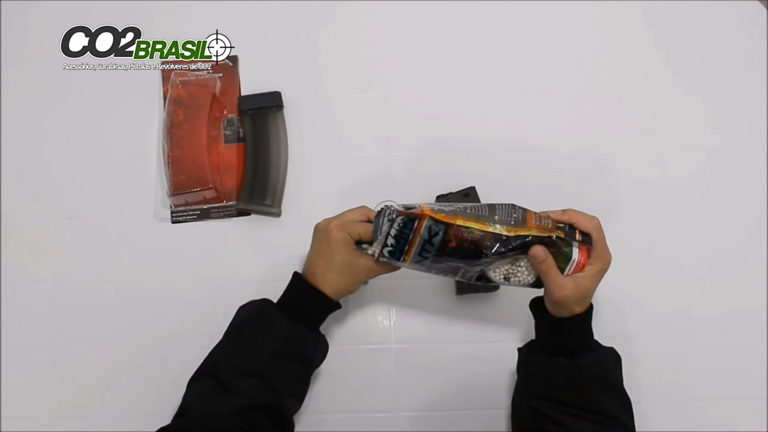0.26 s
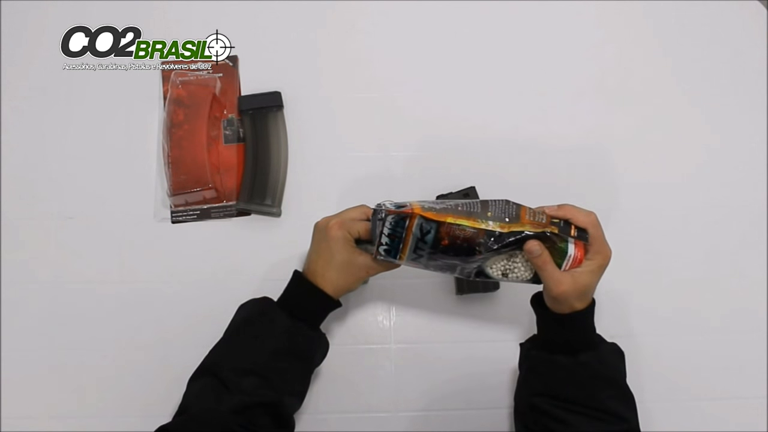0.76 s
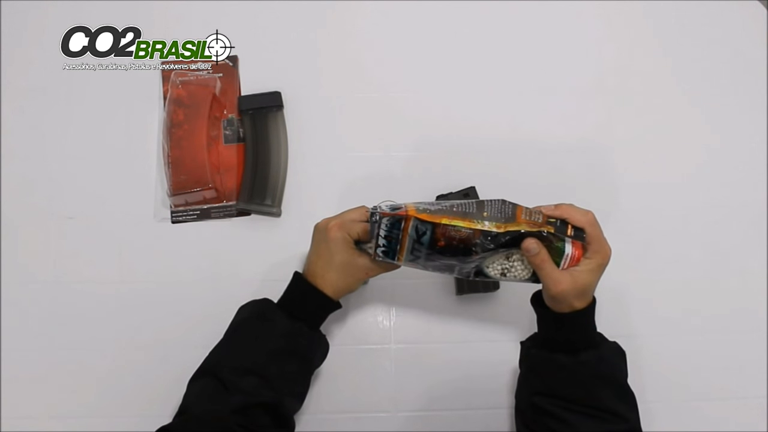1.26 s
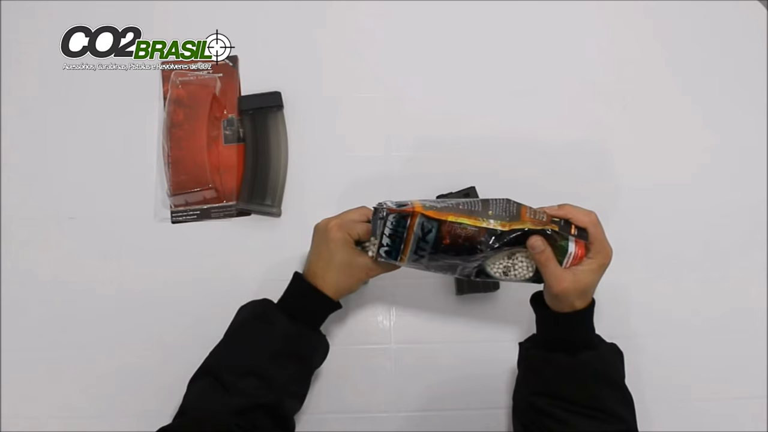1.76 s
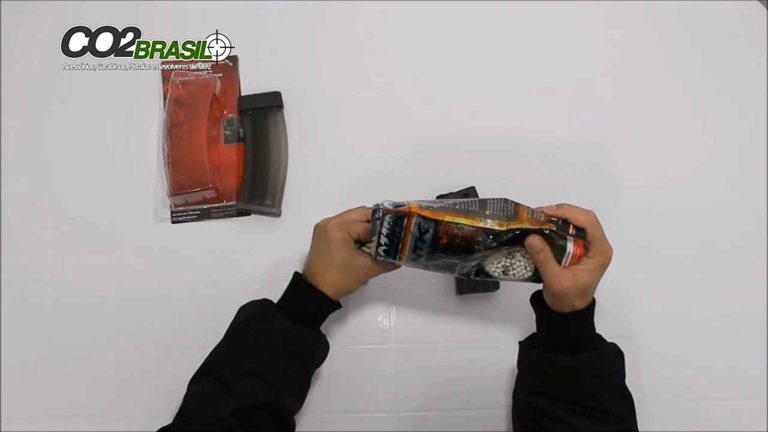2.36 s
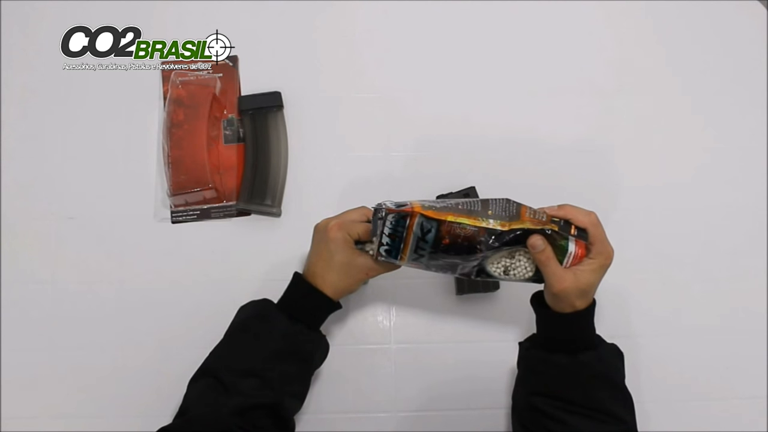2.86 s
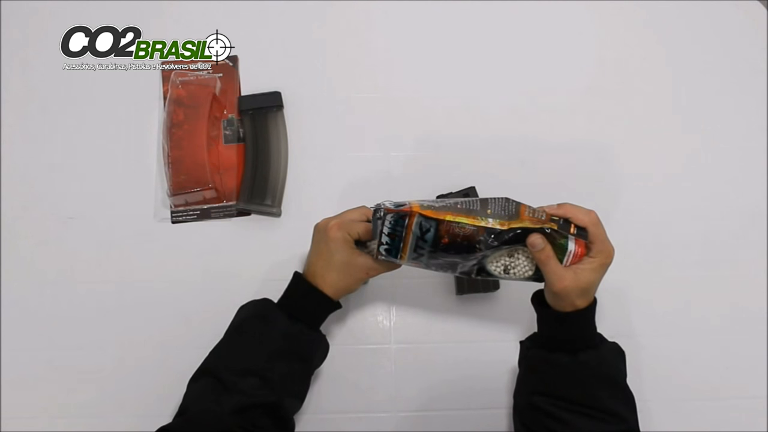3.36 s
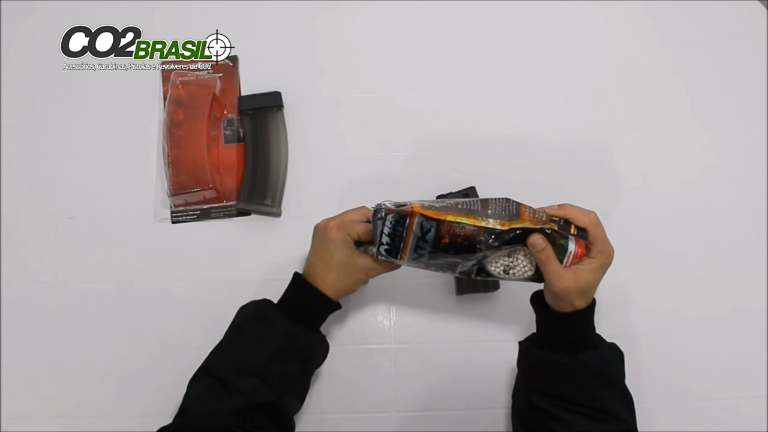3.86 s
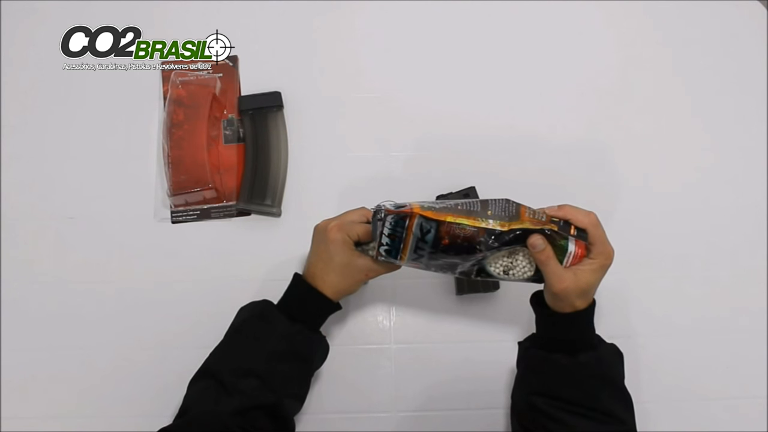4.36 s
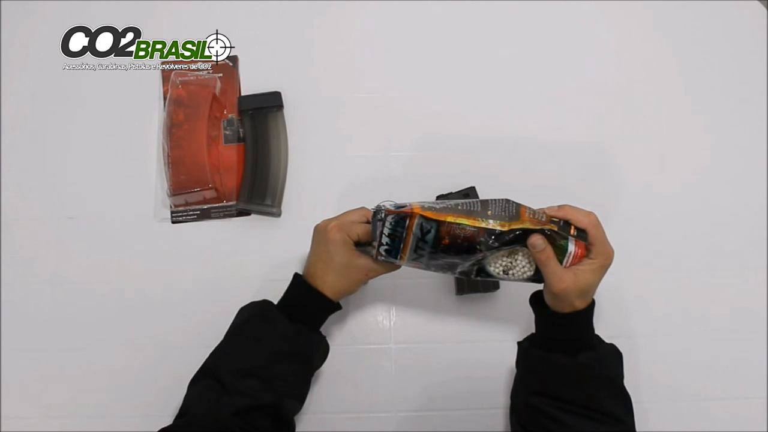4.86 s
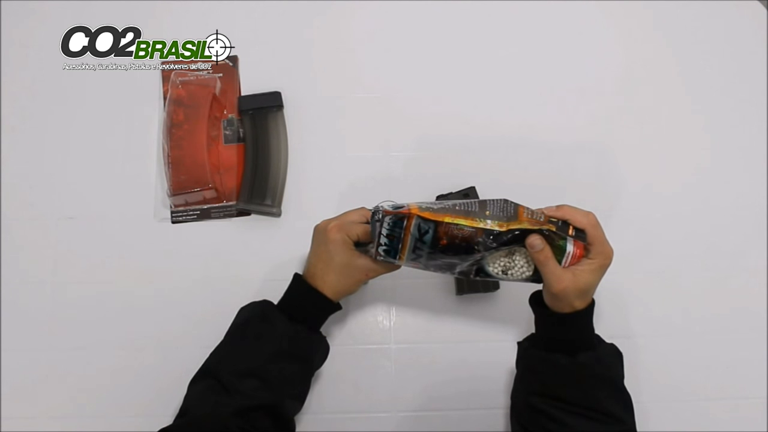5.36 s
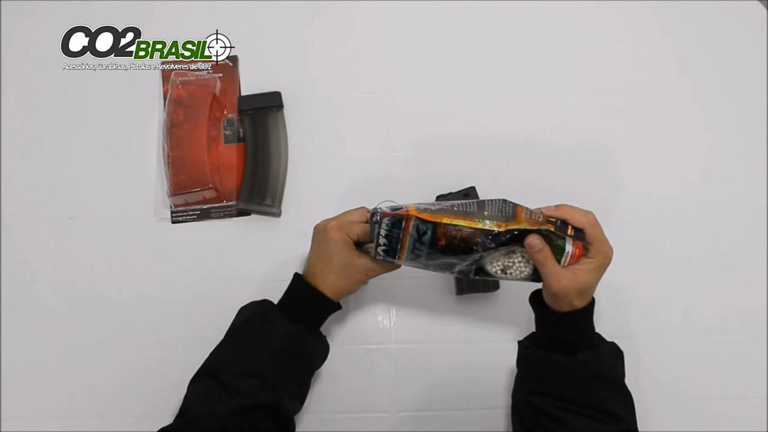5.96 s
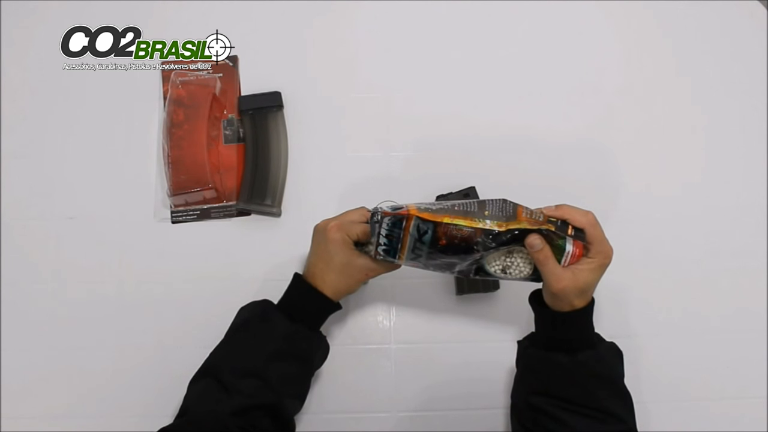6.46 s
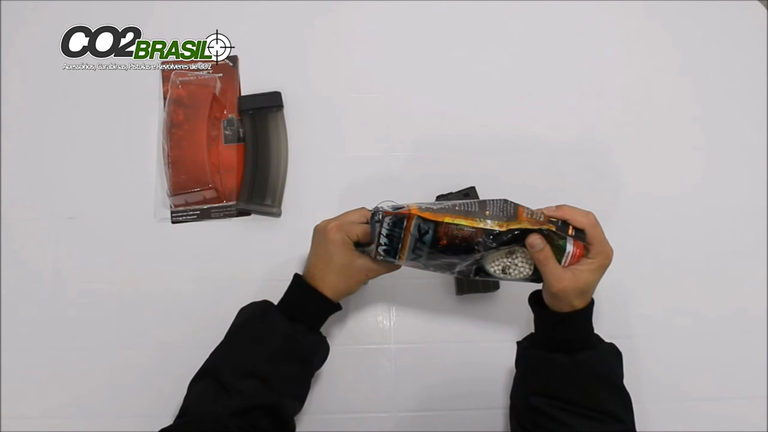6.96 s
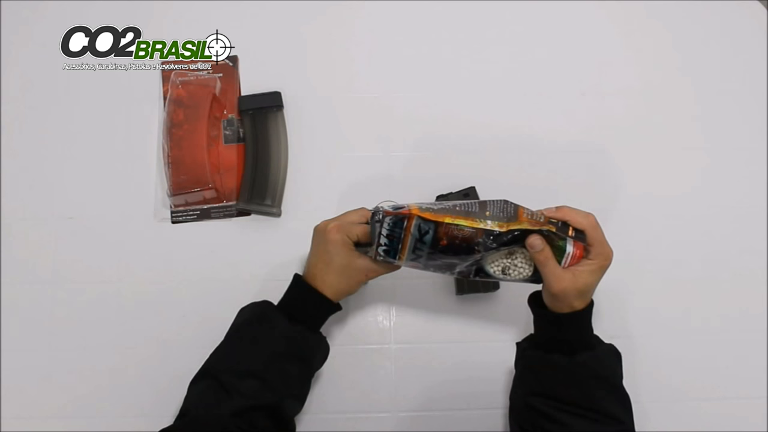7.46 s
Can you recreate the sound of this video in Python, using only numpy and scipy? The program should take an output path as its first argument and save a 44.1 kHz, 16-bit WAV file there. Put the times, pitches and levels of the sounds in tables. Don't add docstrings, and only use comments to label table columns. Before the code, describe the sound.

A bag crinkles for an instant and tiny hard pellets begin pouring into a small plastic container. Sharp individual knocks merge into a continuous, hissing rattle whose ring shifts as the container fills. After several steady seconds it stops quickly, leaving stragglers and foil rustle. Close indoor microphone, short room reflections, low building rumble, slightly rough camera sound.

```python
import sys
import numpy as np
from scipy import signal
from scipy.fft import rfft, irfft
from scipy.io import wavfile
from scipy.ndimage import uniform_filter1d, minimum_filter1d, map_coordinates

SR = 44100
rng = np.random.default_rng(int(sys.argv[2]) if len(sys.argv) > 2 else 0)


def boost_factor(decibels):
    exponent = np.asarray(decibels, float) / 20
    return 10 ** exponent


def store_wav(level_fs):
    pcm = np.round(np.clip(np.atleast_2d(level_fs), -1, 1) * 32767)
    wavfile.write(sys.argv[1], SR, pcm.T.astype(np.int16))


N = 340011

# pitch_hz, level_db (per Hz)
RUMBLE = [(10, -37), (25, -17), (40, -14), (52, 8.5), (65, -16), (82, 14.5), (100, -5), (160, 0),
          (220, -24), (400, -71)]
# centre_s, half_length_s, level_db
SWELLS = [
    (0.05, 0.23, -1.1),
    (1.1, .15, 13),
    (3.9, 0.78, 4),
    (6.198, .4, -1),
]
# pitch_hz, level_db (per Hz)
FOIL = [(60, -61.5), (120, -26.5), (155, -13), (300, -15), (340, -6.5), (650, -8), (770, -1.5), (1150, -2),
        (2100, -4), (3500, -7.5), (6000, -12.5), (10000, -22.5), (16000, -28)]
# start_s, level_db
BAG_LEVEL = [
    (0, -30.5),
    (.25, -31.5),
    (.4, -43),
    (1.5, -44.5),
    (2.5, -39.5),
    (7, -33.5),
    (7.71, -29),
]
# start_s, level_db
POUR = [(.262, -23.5), (.33, -25), (.44, -21), (1.0, -21.5), (1.4, -19.5), (3.0, -20), (4.97, -21),
        (5.12, -25), (5.3, -22), (5.6, -22), (5.7, -35), (5.75, -37), (5.79, -22), (7.12, -21), (7.3, -39),
        (7.35, -25), (7.4, -35), (7.71, -34)]
# start_s, fill (0 empty, 1 half full, 2 full)
FILL = [
    (.3, 0.11),
    (1.5, 0.07),
    (2.1, 1),
    (3.4, 1.1),
    (4.4, 2),
    (7.7, 2),
]
# fill, rate_per_s
CONTACT_RATE = [(0.1, 560), (1.01, 1000), (2.01, 950)]
# fill, level_db (re even flow)
THUD_BY_FILL = [(0.1, -25), (1.01, -13.5), (2.01, -11.5)]
# fill, level_db (re even flow)
TICK_BY_FILL = [(0.1, -11.5), (1.01, -7), (2.01, -8)]
# start_s, peak_db, tick_db (re peak)
BARE = [(0.1745, -17, -23), (0.2663, -3, -14), (0.2784, -11, -19), (0.2954, -10, -12), (0.3052, -2, -18),
        (0.3394, -6, -15), (0.3626, -8, -12), (0.3825, -6, -14), (0.416, -5, -16), (0.4384, -8, -18),
        (0.5344, -7, -17), (0.5534, -7, -18), (0.6254, -6, -19), (0.6619, -7, -20), (0.7074, -5, -19),
        (0.7272, -8, -16), (0.7607, -5, -18), (0.8001, -7, -20), (0.8454, -6, -15), (0.8774, -6, -15),
        (0.8989, -10, -18), (0.9487, -3, -20), (1.0271, -6, -14), (1.1024, -5, -16), (1.1393, -3, -18),
        (1.2421, -4, -17), (1.2524, -6, -20), (1.296, -7, -16), (1.3744, -8, -20), (1.5025, -6, -20)]
# start_s, peak_db, tick_db (re peak)
HEAVY = [(1.5243, -7, -19), (2.0651, -8, -15), (2.551, -8, -15), (2.6652, -6, -16), (3.2748, -8, -16),
         (3.4854, -7, -16), (3.8515, -9, -17), (4.1429, -9, -16), (4.5679, -7, -16), (4.8298, -10, -15),
         (5.1356, -12, -14), (5.2144, -7, -20), (5.3217, -8, -18), (5.39, -9, -14), (5.4868, -10, -16),
         (5.5616, -9, -16), (5.6529, -9, -16), (5.6859, -9, -14), (5.7607, -9, -15), (5.7727, -10, -14),
         (5.9887, -9, -15), (6.1772, -7, -18), (6.271, -10, -17), (6.3818, -7, -21), (6.5923, -8, -14),
         (6.6776, -6, -17), (6.7884, -7, -16), (6.9245, -7, -22), (6.9679, -10, -15)]
# start_s, peak_db, tick_db (re peak)
LAST = [(7.1731, -10, -17), (7.2044, -11, -17), (7.2364, -11, -18), (7.3174, -15, -14), (7.3254, -12, -16),
        (7.3522, -11, -16), (7.414, -8, -21), (7.4254, -14, -16), (7.4364, -14, -15), (7.4474, -17, -14),
        (7.4754, -13, -12), (7.5004, -12, -13), (7.5084, -12, -14), (7.5577, -12, -20), (7.5672, -11, -15),
        (7.5852, -13, -13), (7.5974, -11, -18), (7.6124, -11, -18), (7.6475, -14, -13), (7.6644, -14, -13),
        (7.6754, -11, -16), (7.6944, -15, -19)]
# pitch_hz, width_hz, level_db
WALLS_EMPTY = [(1096, 30, -7), (1330, 100, -16), (1650, 94, 0), (1988, 45, 6), (2057, 55, 5),
               (2854, 40, 8.5), (2962, 45, 7), (3077, 55, 3.5), (3186, 80, -1.5), (3385, 90, -1.5),
               (3980, 120, -15), (4010, 210, -6.5), (4380, 92, -0.5), (5400, 370, -17)]
# pitch_hz, width_hz, level_db
WALLS_HALF = [(818, 35, -5), (1138, 25, -1.5), (1170, 22, -0.5), (1233, 73, 0), (1960, 120, -2),
              (2110, 76, -3), (2308, 94, -2.5), (2696, 65, 1.5), (2847, 57, 2.5), (2950, 76, -4),
              (3490, 230, -1.5), (4117, 82, -1)]
# pitch_hz, width_hz, level_db
WALLS_FULL = [(897, 80, -3.5), (1276, 106, -6.5), (1757, 95, 0), (1870, 47, 1), (2050, 45, -3.5),
              (2208, 71, 1.5), (2260, 61, -1), (2722, 50, 5.5), (2840, 63, 1.5), (2950, 40, -6),
              (3377, 64, 2.5), (3750, 65, -2.5), (4213, 115, -4.5)]
# pitch_hz, level_db
WALL_RADIATION = [(200, -3), (400, -6), (700, -7.5), (850, -0.5), (20000, 0)]
# pitch_hz, level_db (per Hz)
CLACK = [(300, -52.5), (750, -20), (1100, -6), (1500, -7), (1900, -2), (3000, -2), (4500, -3), (6000, -8.5),
         (9000, -25.5), (16000, -58.5)]
# pitch_hz, level_db (per Hz)
SLAP = [(300, -77), (750, -32), (1100, -10), (1500, 1), (1900, -2), (3000, 6), (4500, -4.5), (6000, -17),
        (9000, -20.5), (16000, -64)]
# pitch_hz, level_db (per Hz)
TICK = [(2500, -47), (4500, -8.5), (5500, 1), (7000, 4.5), (8500, 1.5), (9500, -1), (10500, -6),
        (13000, -8), (15500, -13), (17000, -44)]
# pitch_hz, level_db
SHARP = [(4000, -3.5), (9000, 0.5), (14000, 4), (20000, 6)]
# pitch_hz, width_hz, level_db
FLOOR_THIN = [(228, 48, 2), (259, 52, -17), (318, 13, -21), (538, 30, 11)]
# pitch_hz, width_hz, level_db
FLOOR_MIDWAY = [(215, 73, -8.5), (260, 32, -11), (337, 18, -18), (482, 19, -2.5), (550, 65, 0.5),
                (590, 43, 2)]
# pitch_hz, width_hz, level_db
FLOOR_HEAP = [(217, 33, -9), (282, 22, -10), (335, 14, -3), (459, 33, -0.5), (513, 31, -2.5),
              (545.6, 56, 1), (628, 54, -1), (652.7, 25, 2.5)]
# pitch_hz, level_db
LOW_CUT = [(20, -50), (170, -13), (260, -1), (700, -1.5), (1200, -9), (20000, -58)]
# pitch_hz, level_db
SMALL_BIN = [(20, -38.5), (150, -7), (250, 0), (20000, -1)]
# pitch_hz, t60_s
ROOM_DECAY = [(300, 0.51), (2000, 0.76), (6000, 0.38), (14000, 0.16)]
COARSE_BLOCKS = [0, 19, 40, 43, 53, 57, 84, 118, 125, 128, 151, 153, 170, 186, 188, 198, 201, 211, 220, 225,
                 236, 253, 257, 266, 271, 278, 281, 295, 319, 325.5]
# block_number, extra_db
STILL_COARSE = [
    (128, 0),
    (225, 3),
    (278, 0),
]

BLOCK_S, FIRST_BLOCK_S = 1024 / 48000, .4558
FLOW_START_S = BARE[1][0]
SPOTS = 8
STEADY_DB = -21


def unit(x):
    return x / np.sqrt(np.mean(x ** 2) + 1e-20)


def along(points, hz):
    f, v = np.transpose(points)
    return np.interp(np.log(hz + 1), np.log(f + 1), v)


def curve(rows):
    s, value = np.transpose(rows)
    return np.interp(np.arange(N) / SR, s, value)


def wobble(rate):
    knots = rng.standard_normal(int(N * rate / SR) + 4)
    return map_coordinates(knots, [np.arange(N) * rate / SR])


def coloured(x, spectrum):
    size = 2 ** 12
    gain = boost_factor(along(spectrum, np.fft.rfftfreq(size, 1 / SR)))
    cepstrum = irfft(np.log(gain + 1e-6), size)
    cepstrum[1:size // 2] *= 2
    cepstrum[size // 2 + 1:] = 0
    return signal.fftconvolve(x, irfft(np.exp(rfft(cepstrum)), size))[:N]


def air():
    rest_db, ducking, held_db = -55, 0.83, -1.5
    t = np.arange(N) / SR
    rustle_db = curve(BAG_LEVEL)
    duck_db = ducking * np.minimum(rustle_db - rustle_db[0], held_db)
    swell_db = sum(db * np.exp(-((t - s) / half) ** 2) for s, half, db in SWELLS)
    level_db = rest_db + duck_db + swell_db + 1.2 * wobble(3.3)
    return boost_factor(level_db) * unit(coloured(rng.standard_normal(N), RUMBLE))


def bag():
    crackle = (rng.random(N) < .03) * boost_factor(4 * rng.standard_normal(N)) * rng.choice([-1, 1], N)
    rustle = unit(coloured(rng.standard_normal(N) + 0.54 * unit(crackle), FOIL))
    taut = np.clip((np.arange(N) / SR - FLOW_START_S) / .15, 0, 1)
    flapping = (1 - taut) * rustle
    stretched = taut * coloured(rustle, SMALL_BIN)
    return boost_factor(curve(BAG_LEVEL) + .8 * wobble(17)) * (flapping + stretched)


def lone_pellets(fill):
    body, bright = np.zeros((SPOTS, N)), np.zeros((SPOTS, N))
    rise_s = .0007
    for k, (s, peak_db, tick_db) in enumerate(BARE + HEAVY + LAST):
        spot, at = k % SPOTS, round((s + rise_s) * SR)
        depth = fill[round(s * SR)]
        body[spot, at] = (-1) ** k * boost_factor(1.25 * peak_db + 16 - .6 * depth)
        bright[spot, at] = boost_factor(1.25 * peak_db + tick_db + 20.5 - .5 * depth)
    return body, bright


def pour(fill):
    def by_fill(rows):
        return np.interp(fill, *np.transpose(rows))

    ring_db = curve(POUR) + .4 * wobble(8)
    sag_db = ring_db - STEADY_DB
    lurch_db = 1.2 * np.clip(1.3 - fill, .3, 1) * wobble(7)
    thud_db = STEADY_DB + by_fill(THUD_BY_FILL) + 0.48 * sag_db + lurch_db
    tick_db = STEADY_DB + by_fill(TICK_BY_FILL) + 0.63 * sag_db
    rate = by_fill(CONTACT_RATE) * boost_factor(.35 * sag_db)
    return ring_db, thud_db, tick_db, rate


def contacts(rate, spread_db):
    chance = rate * boost_factor(2 * wobble(40)) / SR / SPOTS
    strength = boost_factor(spread_db * np.clip(rng.standard_normal((SPOTS, N)), -3, 1.9))
    strength = strength * rng.choice([-1, 1], (SPOTS, N))
    blows = (rng.random((SPOTS, N)) < chance) * strength / np.sqrt(rate)
    blows[:, :round(FLOW_START_S * SR)] = 0
    return blows / np.sqrt(np.mean(blows.sum(0) ** 2))


def chattered(blows, chatter_db, echo_db, count=14):
    spot, at = np.nonzero(blows)
    first = np.zeros(len(at))
    echo_s = rng.normal(.003, .00015, len(at))
    chatter_s = .0042 * rng.random((len(at), count)) ** 1.4
    late_s = np.c_[first, echo_s, chatter_s]
    chatter = boost_factor(chatter_db) * rng.standard_normal((len(at), count))
    size = np.c_[np.ones(len(at)), boost_factor(echo_db) * np.ones(len(at)), chatter]
    size /= np.linalg.norm(size, axis=1)[:, None]
    where = spot[:, None] * N + np.minimum(at[:, None] + np.round(SR * late_s).astype(int), N - 1)
    size = blows[spot, at][:, None] * size
    return np.bincount(where.ravel(), size.ravel(), blows.size).reshape(blows.shape)


def ringing(blows, modes, scatter_db):
    t = np.arange(SR // 8) / SR
    hz, width, db = np.transpose(modes)[..., None]
    shapes = boost_factor(db) * width * np.exp(-np.pi * width * t) * np.sin(2 * np.pi * hz * t)
    layout = (len(blows), len(modes))
    spots = rng.choice([-1, 1], layout) * boost_factor(scatter_db * rng.standard_normal(layout))
    return signal.fftconvolve(blows, spots @ shapes, axes=1).sum(0)[:N]


def staged(blows, stages, fill):
    total = np.zeros(N)
    for k, modes in enumerate(stages):
        share = np.sqrt(np.clip(1 - abs(fill - k), 0, 1))
        power = SR * sum(boost_factor(2 * db) * width for _, width, db in modes) / (4 * np.pi)
        total += ringing(blows * share, modes, scatter_db=2.0) / np.sqrt(power)
    return total


def wall_ring(blows, fill):
    return coloured(staged(blows, [WALLS_EMPTY, WALLS_HALF, WALLS_FULL], fill), WALL_RADIATION)


def impact(blows, spectrum, stream):
    return coloured(blows, spectrum) / np.std(coloured(stream.sum(0), spectrum))


def landings(blows, fill, stream):
    covered = np.clip(fill, 0, 1)
    slap = boost_factor(-5.5) * impact(np.sqrt(1 - covered) * blows, SLAP, stream)
    clack = impact(np.sqrt(covered) * blows, CLACK, stream)
    return slap + clack


def pellet_ticks(stream, bright, tick_db):
    hard = stream * abs(stream) ** .55
    hard *= np.std(stream) / np.std(hard)
    ticks = chattered(boost_factor(tick_db - 2.5) * hard, chatter_db=-8.5, echo_db=-2).sum(0)
    sharp = coloured(chattered(bright, chatter_db=-3.5, echo_db=-4.0).sum(0), SHARP)
    return boost_factor(4) * impact(ticks + sharp, TICK, stream)


def heap_thud(stream, rate, fill, thud_db):
    shuffle = stream + 1.05 * contacts(rate, spread_db=-1.0)
    depth = np.clip(2 * fill - 1.4, 0, 2)
    floor = staged(shuffle, [FLOOR_THIN, FLOOR_MIDWAY, FLOOR_HEAP], depth)
    return boost_factor(thud_db - 1.0) * unit(coloured(floor, LOW_CUT))


def pellets():
    fill = curve(FILL)
    ring_db, thud_db, tick_db, rate = pour(fill)
    stream = contacts(rate, spread_db=2.5)
    body, bright = lone_pellets(fill)
    flow = chattered(boost_factor(ring_db - 2.5) * stream, chatter_db=-8, echo_db=-4.5)
    loud = chattered(body, chatter_db=-6.5, echo_db=-1)
    ring = boost_factor(-2.5) * wall_ring(flow + boost_factor(-5.0) * loud, fill)
    landed = landings((flow + boost_factor(2.0) * loud).sum(0), fill, stream)
    tick = pellet_ticks(stream, bright, tick_db)
    return ring + landed + tick + heap_thud(stream, rate, fill, thud_db)


def room(x):
    out, hop = np.zeros(N + SR), SR // 10
    for a in range(0, N, hop):
        hz, t, z = signal.stft(rng.standard_normal(SR // 3), SR, nperseg=256)
        decay = boost_factor(-60 * t / along(ROOM_DECAY, hz)[:, None])
        tail = signal.istft(z * decay, SR, nperseg=256)[1]
        wet = signal.fftconvolve(x[a:a + hop], tail / np.linalg.norm(tail))
        out[a:a + len(wet)] += wet
    return np.pad(out, (round(.006 * SR), 0))[:N]


def scene():
    near = coloured(pellets(), SMALL_BIN)
    return (boost_factor(-2.0) * (near + boost_factor(-4) * room(near)) + bag() + air())[None]


def coarse_blocks(x):
    step_db = -9.2 + 3.5
    half = round(BLOCK_S * SR)
    k, n = np.arange(half) + .5, np.arange(2 * half) + .5
    window = np.sqrt(2 / half) * np.sin(np.pi * n / (2 * half))
    basis = window * np.cos(np.pi / half * np.outer(k, n + half / 2))
    slope = boost_factor(-2.2 * np.log2(np.maximum(k / 60, 1)))
    out = x.copy()
    blocks = [(at, 0) for at in COARSE_BLOCKS] + [(at + 1, db) for at, db in STILL_COARSE]
    for block, extra_db in blocks:
        span = round(FIRST_BLOCK_S * SR) + round((block - 1) * half) + np.arange(2 * half)
        lines = basis @ x[span]
        step = boost_factor(step_db + extra_db) * np.max(abs(lines)) * slope * 2
        out[span] += (step * np.round(lines / step) - lines) @ basis
    return out


def roll_off(x):
    return signal.sosfilt(signal.butter(12, 16510, fs=SR, output="sos"), x)


def record(dry):
    span = round(SR / 400)
    need = np.minimum(1, .55 / (abs(dry[0]) + 1e-9))
    gain = uniform_filter1d(minimum_filter1d(need, size=span), size=span // 2)
    rough = coarse_blocks(dry[0] * gain)
    in_band = np.fft.rfftfreq(N, 1 / SR) < 15810
    mix = irfft(rfft(rough) * in_band, N)
    return roll_off(mix[None])


dry = scene()
out = record(dry)
store_wav(out)
```